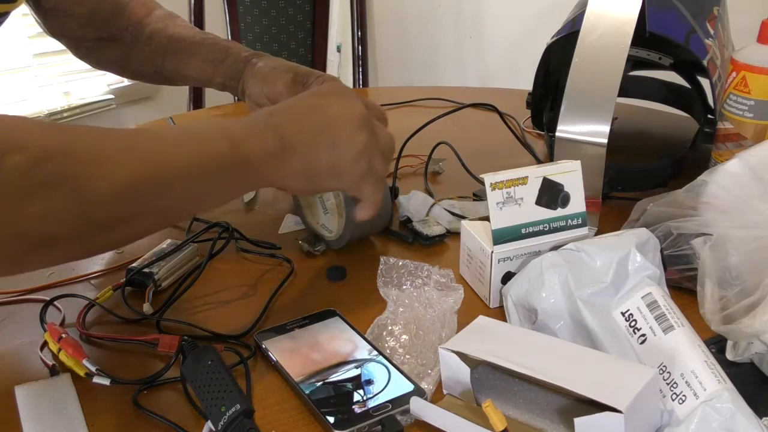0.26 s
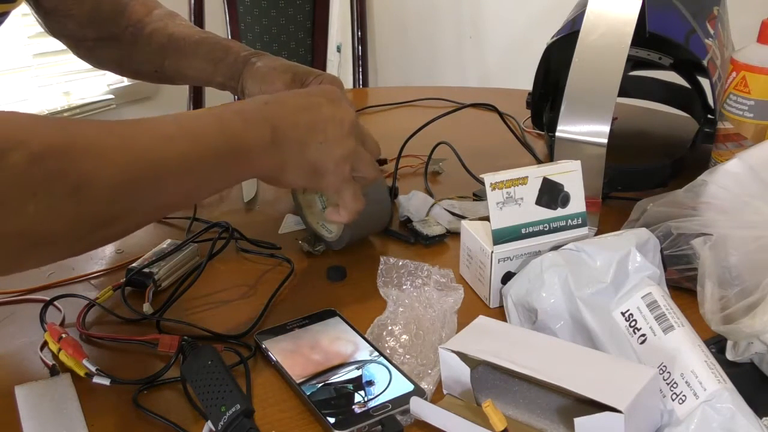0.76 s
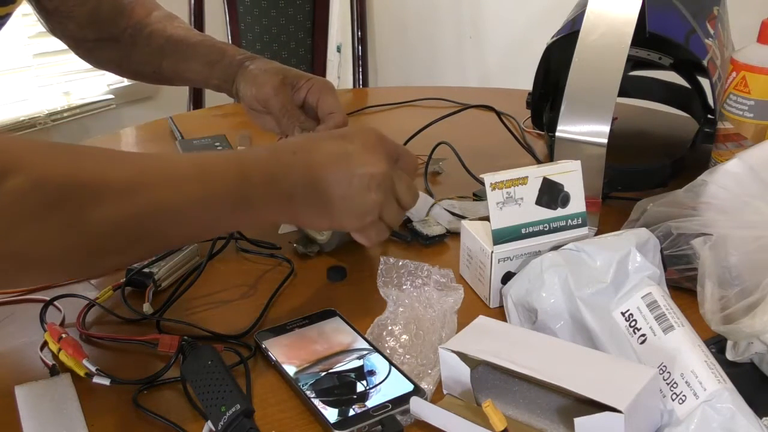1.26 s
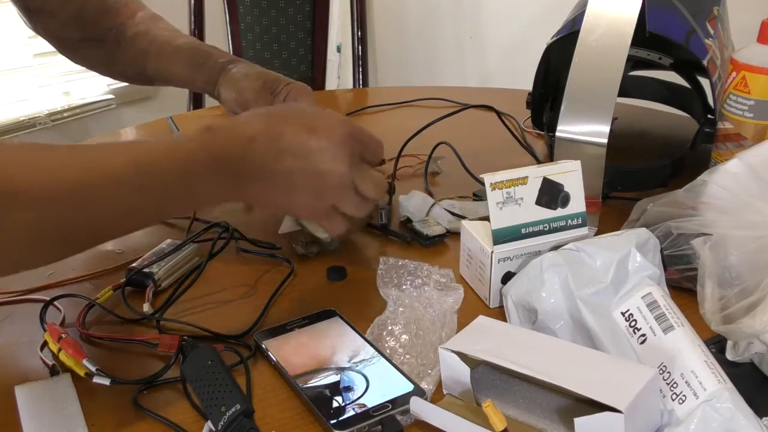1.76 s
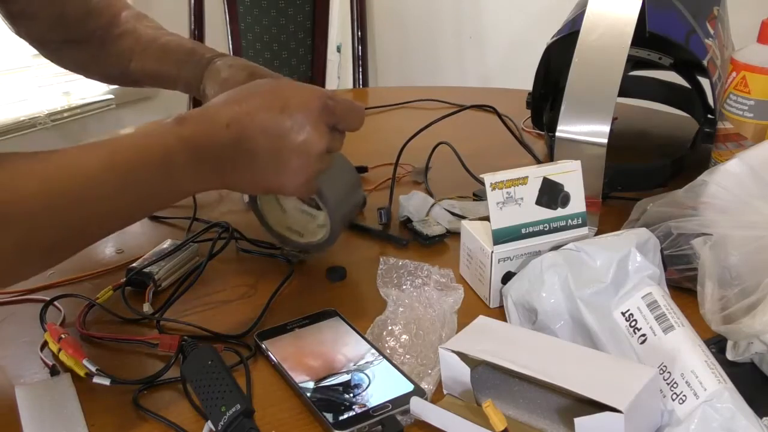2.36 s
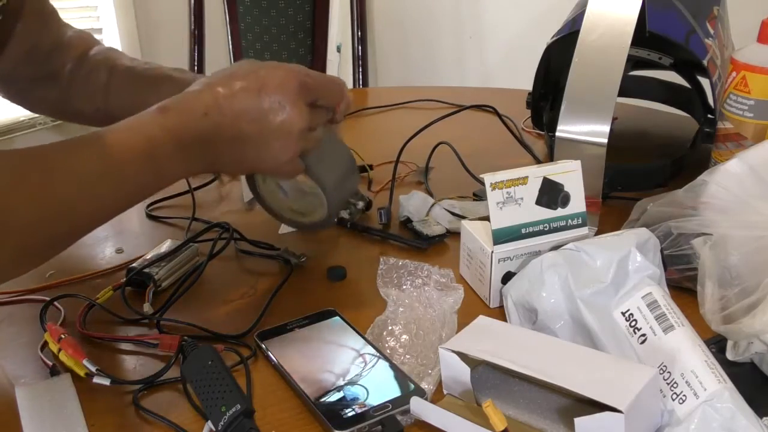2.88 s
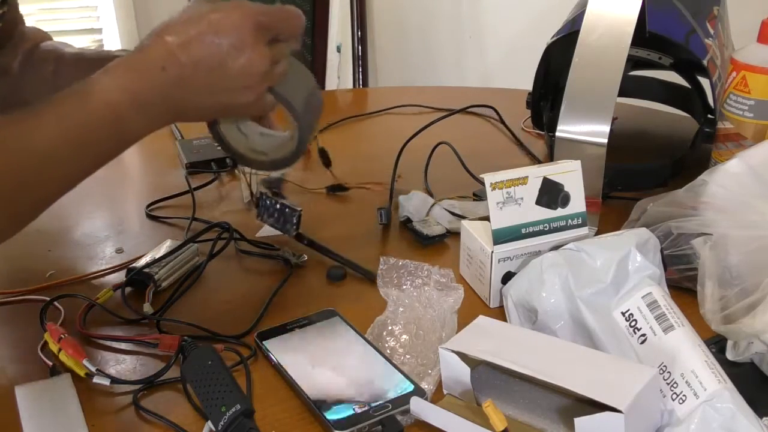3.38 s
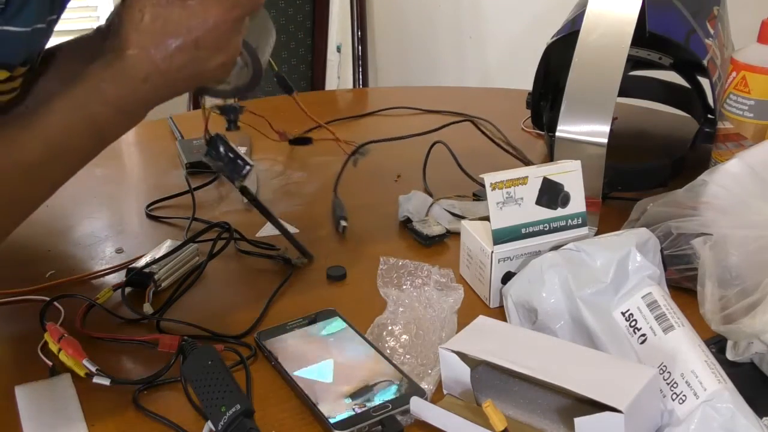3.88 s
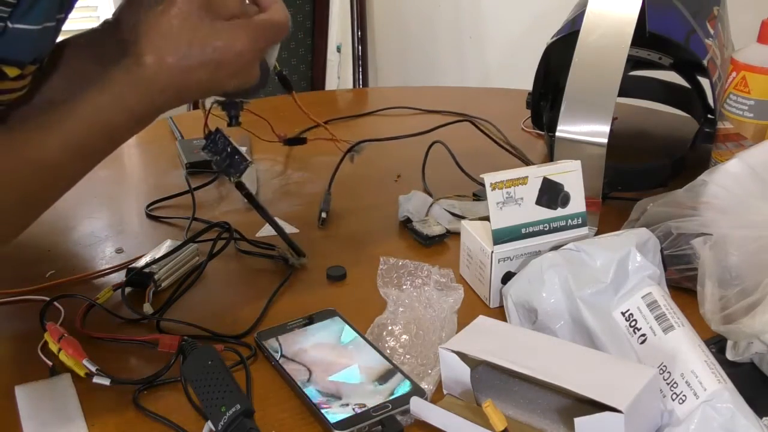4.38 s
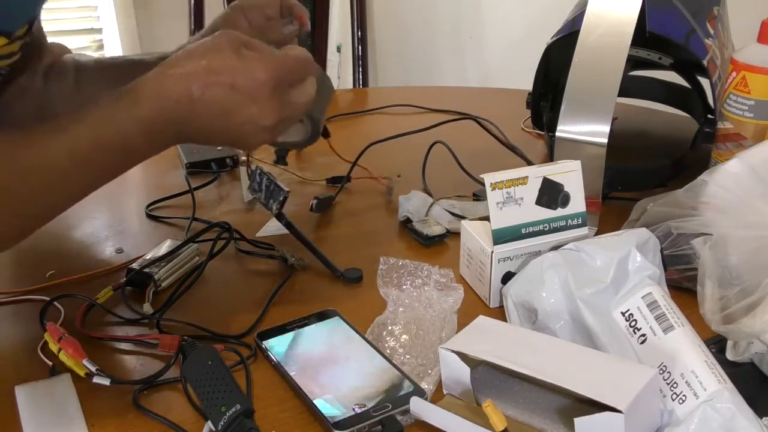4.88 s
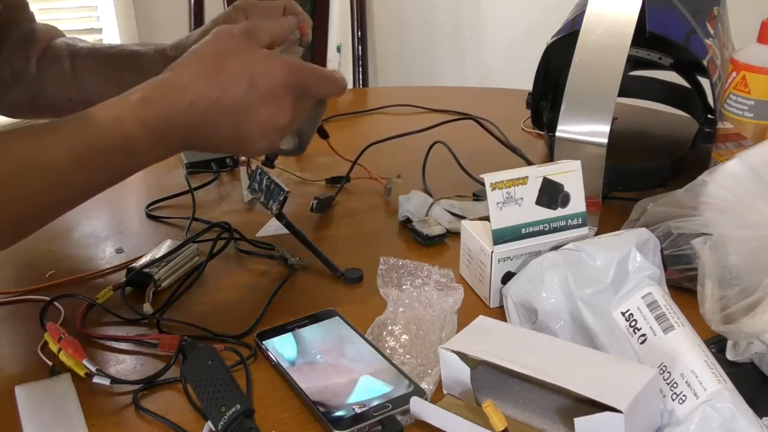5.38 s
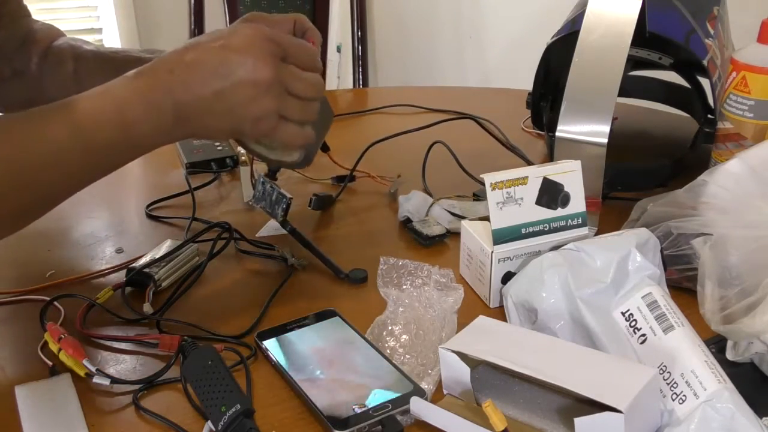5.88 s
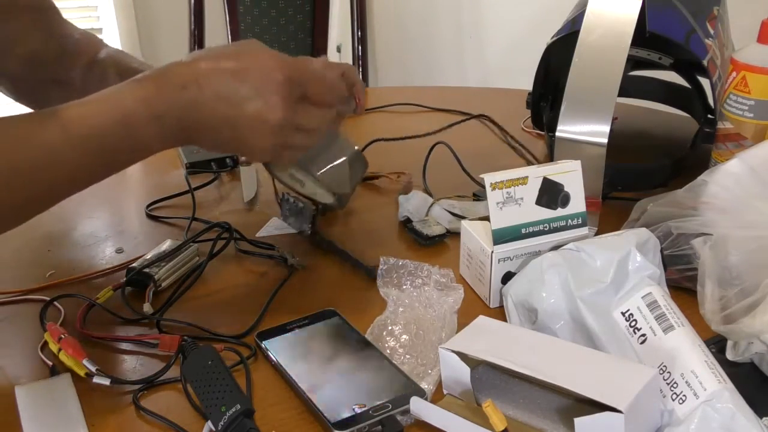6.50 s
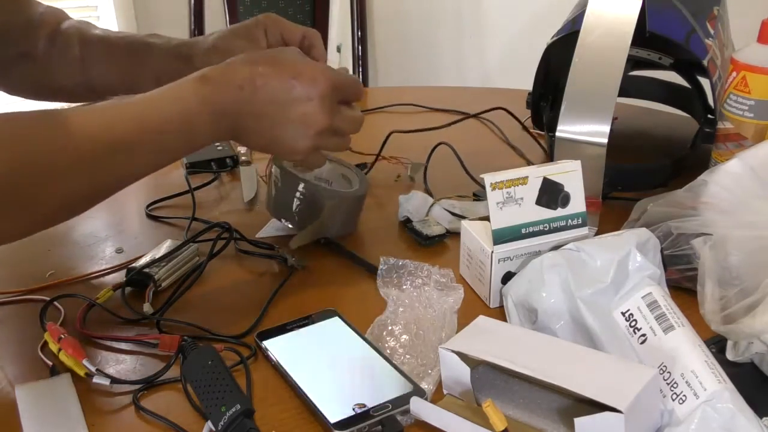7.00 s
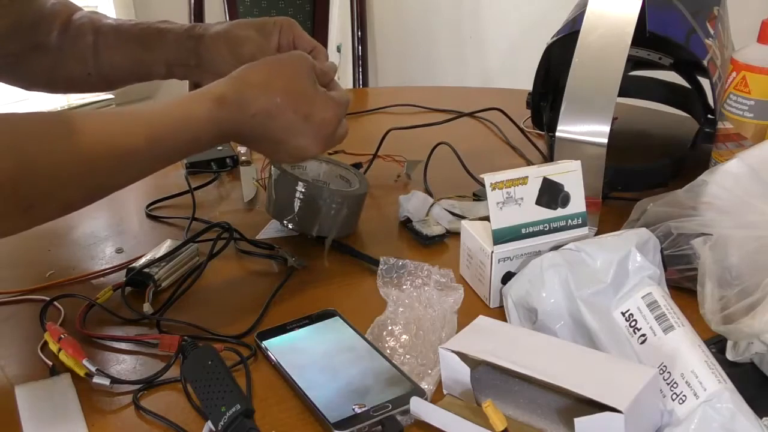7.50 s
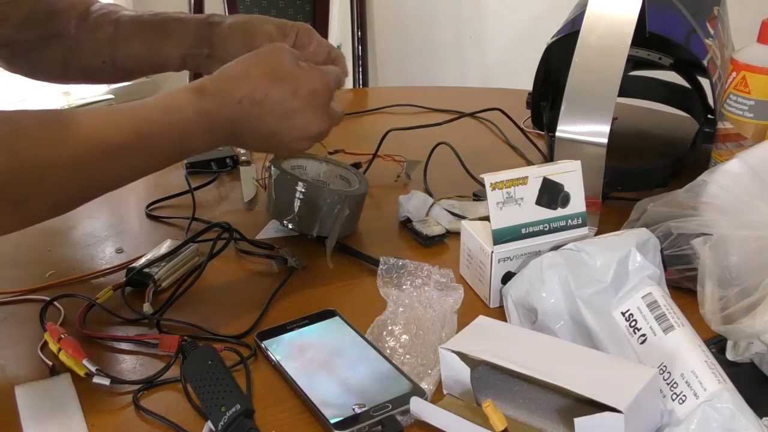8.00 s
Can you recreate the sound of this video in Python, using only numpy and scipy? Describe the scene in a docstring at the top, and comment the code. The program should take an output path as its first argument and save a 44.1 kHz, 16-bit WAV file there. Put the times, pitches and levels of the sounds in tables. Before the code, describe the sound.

In a hard, small-sounding room with a soft low hum and slight hiss, hands handle a roll of duct tape close to the microphone. The first 1.4 seconds are quiet, with only faint ticks and sticky crackle. Around 1.55 to 1.98, very loud bright snaps come in two bursts, near 1.68 and 1.91, each with a rasping rip fading over under 0.2 seconds. Smaller snaps and crackle follow; hard clacks and woody thumps land around 2.58, 3.3 and 3.6. A faint airy swish passes near 3, and soft rubbing squeaks near 3.5 and 3.8. Light clicks lead to a sharp snap at 4.88, then a strong snap and booming knock at 5.56. After a quieter gap, crisp ticks and short rips appear from 6.36 to 6.7. Knocks cluster from 6.95 to 7.4, strongest near 7.25, then handling thins out, with a small snap at 8.2.

```python
"""Bright snaps and short rips burst out as hands work a roll of duct tape over a cluttered wooden table.
Snaps are short noise bursts, rips and soft rustles are crowded clicks,
and faint breathy swishes and a soft rubbing squeak are clicks through a narrow resonance.
Knocks and scuffs ring the hard roll and small parts, and the booming table top, as sets of fading tones.
A hard room adds a few early bounces and a noisy, fading tail; a quiet hum lies beneath."""
import sys
import numpy as np
from scipy import signal
from scipy.fft import rfft, irfft
from scipy.io import wavfile

SR = 44100
rng = np.random.default_rng(int(sys.argv[2]) if len(sys.argv) > 2 else 0)


def wrap_up_sound(samples):
    """Save the sound to the file named by the first command line argument, as 16-bit audio."""
    columns = np.atleast_2d(samples).T
    # keep every value between -1 and 1, then stretch to whole-number steps
    tamed = np.clip(columns, -1, 1)
    steps = np.round(tamed * 32767).astype(np.int16)
    wavfile.write(sys.argv[1], SR, steps)


def boost_factor(decibels):
    """Convert a level in decibels to a linear amplitude factor."""
    exponent = np.asarray(decibels, float) / 20
    return 10 ** exponent


N = 363825  # samples, 8.25 seconds

# Glue letting go in clear snaps.
# Each row: start in seconds, peak in dB before panning, treble against body in dB before bright colouring.
GLUE_SNAPS = [(0.2618, -35, 4), (0.5775, -26, -6), (0.9992, -37.5, 3), (1.4, -22.5, 0), (1.556, -12.5, -4),
              (1.5656, -12.5, 29), (1.6795, -1.5, 1), (1.6861, -4, 22), (1.6969, -63, 22),
              (1.7419, -12, 19), (1.9121, -3, 25), (1.917, -4.5, 7), (1.9435, -6, 0), (1.9529, -23, -44),
              (1.9768, -14, 11), (2.1947, -29, 16), (2.2016, -26, -1), (2.2629, -22, -1.5),
              (2.2798, -26.5, -4), (2.2998, -29.5, 3), (2.3695, -27, -4), (2.4565, -31.5, -4.5),
              (2.5886, -21, -11), (2.6873, -33, -9), (3.5176, -34, -12), (3.731, -35.5, -14),
              (3.8565, -27.5, 14), (3.995, -31.5, 7), (4.2085, -19.5, -9), (4.2342, -19, -6),
              (4.4486, -30, -10), (4.4982, -30.5, -2), (4.588, -28.5, -5.5), (4.616, -23.5, 0.5),
              (4.653, -24, -2.5), (4.7294, -17, -1), (4.7634, -26, -6), (4.8446, -24.5, -6),
              (4.865, -12, 8), (4.8775, -4, 1), (5.021, -38, 2), (5.0427, -19, 5), (5.0853, -28, 2),
              (5.1464, -26, -37), (5.1822, -22.5, 5), (5.2565, -25, -13), (5.299, -26, 15),
              (5.339, -27, 13), (5.3565, -33, 8), (5.3691, -18.5, 20), (5.5583, -5, -1),
              (5.7041, -15.5, 2.5), (5.987, -38.5, 0), (6.2258, -32.5, 2), (6.3121, -27, 2),
              (6.3578, -13.5, 12), (6.3758, -11.5, 16), (6.406, -16, -6), (6.557, -28.5, -6),
              (6.5775, -15.5, -43), (6.6904, -12.5, 19), (6.8039, -33, 7), (6.855, -31, -1),
              (6.8727, -27.5, -16), (7.0163, -16, 1.5), (7.2497, -24, -33), (7.2804, -19.5, -2),
              (7.288, -15.5, -8), (7.3863, -32.5, -10), (8.2038, -23, 2)]
# Roll and parts striking the table. Each row: start in seconds, clack drive in dB,
# clack brightness in dB per octave, table boom drive in dB, boom brightness in dB per octave.
TABLE_KNOCKS = [(0.5749, -53.5, 2, -51.5, -10), (0.7682, -59, -12.5, -60, 13), (0.8184, -58, -1, -44.5, -8),
                (1.2628, -55.5, -9, -58, 13), (1.3283, -52, 0, -67, -3), (1.3983, -63, 20, -49, 0),
                (1.467, -53.5, -5, -50.5, -13), (1.5549, -45.5, 27, -49, -10), (1.681, -26, -1.5, -46, -9),
                (1.9162, -44.5, -15, -40.5, 2), (1.9458, -25.5, 18, -44, 2), (1.9724, -37, 16, -49, 7),
                (2.194, -43.5, 16, -42, -3), (2.3163, -42.5, 3, -35.5, 1), (2.3767, -42, -4.5, -42, 2),
                (2.5563, -49.5, 16, -42, -6), (2.5748, -33.5, -4.5, -32, 3), (2.5854, -22.5, 6.5, -27, -5),
                (2.7583, -29.5, -4, -33, 14), (2.8217, -32.5, 3.5, -42, 0), (3.0604, -65, 7, -43, -1.5),
                (3.134, -50, 11, -43, -7), (3.3003, -33.5, -5, -32.5, 2), (3.4667, -40, -9, -39.5, 6),
                (3.526, -37.5, 1, -44, 14), (3.576, -56.5, -19, -37.5, 6), (3.606, -21.5, 6, -34, 12),
                (3.6167, -31, 0, -42, 4), (3.7094, -48.5, 25.5, -39.5, -3), (3.7345, -29, 5.5, -51, 11),
                (4.2094, -32, 6.5, -41, 6.5), (4.255, -39.5, 6, -65, 9), (4.4905, -47, -5, -43.5, 6.5),
                (4.5524, -45, -9, -52.5, 10), (4.8579, -31, -5.5, -68, 9), (4.8677, -35.5, 11, -47, 18),
                (5.2389, -28.5, 13, -52, -4), (5.364, -39.5, 6.5, -60, 18), (5.5582, -19, 7, -13.5, 1.5),
                (6.1418, -46, 17.5, -52, -8), (6.235, -48, 17.5, -50, -14), (6.359, -42.5, 20, -63.5, 23),
                (6.5714, -36, 13.5, -47.5, 18), (6.871, -47, 20, -47.5, -3), (6.9452, -41, -4, -45, 7),
                (6.965, -26, -8, -26.5, 2.5), (7.0501, -34, -1, -35, 10), (7.0874, -25, -0.5, -36.5, 1),
                (7.0954, -35, -0.5, -40.5, 16), (7.1675, -43, 8, -38, -7), (7.2465, -16.5, 2, -24, 14),
                (7.2854, -16, 15.5, -19.5, -1), (7.3483, -70, -4, -25.5, -6),
                (7.3854, -36.5, -10.5, -26.5, -0.5), (7.4905, -39.5, -3.5, -45, 11),
                (7.6273, -49, -10.5, -48.5, 9.5), (8.2005, -49.5, 0, -62.5, -6)]
# Tape rips and soft rustles. Each row: start in seconds, length in milliseconds, first level in dB,
# last level in dB, treble in dB.
RIPS_AND_RUSTLES = [(1.679, 158, -21.5, -40.5, 1), (1.911, 178, -24, -44, -1), (2.262, 35, -43, -27, 0),
                    (2.571, 15.5, -35, -26, -1.5), (2.757, 21, -58, -60, -1), (2.969, 31, -51, -55, -5),
                    (3.128, 36, -43, -56, 0), (3.707, 50, -59, -46, -5), (4.03, 44, -39.5, -46.5, -0.5),
                    (4.395, 33, -51.5, -53, 1), (4.866, 13, -30.5, -32.5, -1),
                    (6.689, 10, -30.5, -40, -2.5), (6.794, 28, -42, -46, -2.5), (4.209, 110, -51, -52, -1),
                    (4.847, 35, -31, -34, -1), (5.363, 48, -34, -45, -0.5), (5.561, 14.3, -28, -33, 1),
                    (6.358, 17, -18.5, -32, -2), (6.571, 74, -29, -46, -46), (6.844, 77, -38.5, -57, 1.5),
                    (7.278, 9.5, -39, -26, -17.5), (7.3, 134, -67, -42, -5)]
# Steady handling, before its uneven drift. Each row: time in seconds, drag on the table in dB,
# scuffing of the roll in dB, scuffing brightness in dB per octave, glue crackle in dB.
HANDLING_LEVELS = [(0.0, -102, -93.5, 3, -72.5), (1.1, -115, -100, 2, -80), (1.6, -86.5, -85, -1, -98),
                   (1.76, -105, -69.5, -4, -72), (1.89, -103, -100, 0, -77), (2.04, -86, -65.5, 17, -52),
                   (2.23, -99, -79, -1, -69), (2.5, -82, -83, 5, -61.5), (2.73, -78, -70, 0.5, -58.5),
                   (2.9, -92, -79.5, 5, -60.5), (3.1, -86.5, -76.5, -3, -62), (3.4, -90, -73, 1, -69),
                   (3.55, -76, -66, 5, -57), (3.8, -100, -76.5, 9, -67), (3.95, -97.5, -79, 6, -53),
                   (4.15, -89, -76, 5, -55.5), (4.41, -82.5, -71.5, -0.5, -62.5),
                   (4.66, -115, -77, 6.5, -64.5), (5.3, -100, -83.5, 8.5, -48), (5.6, -110, -88, -4, -89),
                   (6.05, -91.5, -78, 3.5, -64), (6.27, -85, -80, 9, -49.5), (6.5, -110, -92, -4.5, -53.5),
                   (7.0, -103, -67.5, 8, -49), (7.35, -94, -62, 5, -57), (7.5, -90, -67.5, 5, -68),
                   (7.79, -108, -105, 8, -78), (8.25, -105, -100, 2.5, -74.5)]
# Tones of the table top. Each row: pitch in Hz, level in dB, time to fade by 60 dB in seconds.
TABLE_MODES = [(71, -27, 0.15), (134.6, -14, 0.34), (210, -3, 0.083), (245, -11.5, 0.34),
               (292.4, -1.5, 0.093), (332, -3, 0.14), (383.7, -3, 0.091), (435.2, -4, 0.1),
               (501.5, -4.5, 0.067)]
# Tones of the cardboard core and hard small parts.
# Each row: pitch in Hz, level in dB, time to fade by 60 dB in seconds.
ROLL_MODES = [(576, -5, 0.0061), (1084, 1.5, 0.012), (1253, -2.5, 0.028), (1388, 2, 0.0095),
              (1607, 0.5, 0.012), (1842, 4, 0.0088), (2000, 3, 0.009), (2300, 0, 0.0081), (2880, 2, 0.0033),
              (3580, -5, 0.0016), (4040, -4.5, 0.0018)]
# Bright colouring of snaps and crackle: a few broad lifted bands, strongest near 9 kHz.
# Each row: centre in Hz, width in Hz, lift in dB.
BRIGHT_BANDS = [(3050, 6300, 9), (6240, 710, 4.5), (8860, 3900, 16.5)]
# How long the walls ring. Each row: pitch in Hz, time to fade by 60 dB in seconds.
WALL_FADE = [(100, 0.93), (260, 0.41), (700, 0.48), (1840, 0.47), (4850, 0.39), (12800, 0.27)]
# How strongly the walls ring. Each row: pitch in Hz, level in dB against the direct energy.
WALL_STRENGTH = [(100, 0), (300, 9.5), (1000, 3.5), (3000, -2.5), (8000, 2.5), (15000, -8)]
# How alike the walls sound left and right. Each row: pitch in Hz, likeness from 0 to 1.
WALL_ALIKE = [(100, 0.99), (400, 0.96), (1500, 0.51), (5000, 0.64), (15000, .05)]
# First bounces. Each row: left delay in milliseconds, right delay in milliseconds, level in dB.
FIRST_ECHOES = [(3.2, 9.9, -11), (8.5, 7.4, -3.5), (16.5, 16, -17)]
# Shape of the room hum. Each row: pitch in Hz, relative level in dB per Hz.
HUM_SHAPE = [(12, -59), (20, -10), (103, -5), (136, -4.5), (166, -4.5), (283, -9), (317, -19), (375, -12),
             (623, -27.5), (1220, -15.5), (2770, -23.5), (4350, -31), (5150, -38), (15000, -26),
             (16800, -64.5)]
# How alike the hum sounds left and right. Each row: pitch in Hz, likeness from 0 to 1.
HUM_ALIKE = [(30, 0.83), (130, 0.27), (640, 0.57), (1400, 0.21), (5000, 0.25), (15000, .05)]
# Faint breathy swishes and a soft rubbing squeak.
# Each row: start in seconds, length in seconds, level in dB at full swell, centre in Hz,
# width in Hz of each of two passes.
SWISHES_AND_SQUEAK = [(2.86, 0.45, -64, 12500, 1780), (3.427, 0.042, -63.5, 9800, 2000),
                      (3.454, 0.12, -57, 2620, 400), (3.753, 0.27, -57, 2550, 350),
                      (5.922, 0.41, -63, 1110, 249)]

SMALL_SNAPS_PER_S, SMALL_SNAP_DB, SMALL_SPREAD_DB = 12, 11, 5  # rate, peak over the crackle, spread either way
SNAP_PAN_DB, SNAP_PAN_SPREAD_DB = -1.0, 3.5  # left minus right, and its random spread
PATCHY_DB, DRIFT_HZ = 5.5, 4  # scuffing and crackle swell and fade unevenly: spread and speed
CRACKLE_TREBLE_DB = -1  # crackle's upper band, between rips and rustles
CONTACT_RISE_MS = 0.99  # a blow takes a moment to build
DRAG_TILT_DB = 3.5  # per octave
HUM_DB = -59.5
LEFT_LAG_MS = 0.016


def in_time(rows):
    """Reads the columns of a table at every sample, sliding between its rows."""
    s, *columns = np.transpose(rows)
    return [np.interp(np.arange(N) / SR, s, column) for column in columns]


def at_hz(points, hz):
    """Reads a curve on a log-frequency axis, because equal pitch steps are equal ratios."""
    table_hz, values = np.array(points).T
    return np.interp(np.log(hz), np.log(table_hz), values)


def rms_one(x):
    """Scales a sound to an rms (average strength) of 1."""
    return x / np.sqrt(np.mean(x ** 2) + 1e-20)


def cut(x, hz, kind, order=2):
    """Butterworth filter: removes part of the pitch range smoothly."""
    return signal.sosfilt(signal.butter(order, hz, kind, fs=SR, output="sos"), x)


def resonate(x, hz, width_hz):
    """A resonance passes its own pitch at gain 1 and less of what lies around it."""
    r = np.exp(-np.pi * width_hz / SR)
    forward = [(1 - r * r) / 2, 0, (r * r - 1) / 2]
    feedback = [1, -2 * r * np.cos(2 * np.pi * hz / SR), r * r]
    return signal.lfilter(forward, feedback, x)


def ring(clicks, hz, t60):
    """A unit click sets a fading sine of height 1 ringing."""
    r, w = boost_factor(-60 / (t60 * SR)), 2 * np.pi * hz / SR
    return signal.lfilter([0, np.sin(w)], [1, -2 * r * np.cos(w), r * r], clicks + 1e-18)


def grains(per_s, spread_db):
    """Random clicks of uneven size, like tiny separate slips; rms 1."""
    sizes = boost_factor(spread_db * np.minimum(rng.exponential(1, N), 5)) * rng.choice([-1, 1], N)
    return rms_one(sizes * (rng.random(N) < per_s / SR))


def bursts(times, length_ms):
    """One break per event: noisy micro-slips die away, fairly even in spectrum; energy 1."""
    dying = np.exp(-np.arange(1024) * 1000 / SR / length_ms)
    spectrum = rfft(rng.standard_normal((len(times), 1024)) * dying, axis=1)
    evened = irfft(spectrum / np.abs(spectrum) ** .7, axis=1)
    rows = evened * dying ** .3
    return rows / np.sqrt(np.sum(rows ** 2, axis=1, keepdims=True))


def add(track, times, rows):
    """Lays short sounds into a track at their times, so overlaps sum."""
    for s, row in zip(times, rows):
        i = round(s * SR)
        track[..., i:i + row.shape[-1]] += row[..., :N - i]


def drift(speed_hz):
    """Slow random wandering with a spread of 1: noise smoothed by two equal low-pass steps."""
    r = np.exp(-2 * np.pi * speed_hz / SR)
    wandering = signal.lfilter([1], [1, -2 * r, r * r], rng.standard_normal(N + SR))
    return rms_one(wandering[SR:])  # skip one second of settling


def stereo_bands(likeness, size, count):
    """Stereo noise in count bands per octave, as (centre Hz, width Hz, noise); neighbours are unrelated."""
    white = rng.standard_normal((2, 2, size))
    edges = 20 * 2 ** np.arange(0, 10.01, 1 / count)
    for k, (low, high) in enumerate(zip(edges, edges[1:])):
        mid, side = cut(white[k % 2], [low, high], "band")
        hz = np.sqrt(low * high)
        alike = np.clip(at_hz(likeness, hz), 0, 1)
        noise = np.sqrt(1 + alike) * mid + np.sqrt(1 - alike) * side * [[1], [-1]]
        yield hz, high - low, noise


def bright_colour(x):
    """Bright colouring of snaps and crackle: resonances added to the sound lift a few broad bands."""
    return x + sum((boost_factor(db) - 1) * resonate(x, hz, width_hz) for hz, width_hz, db in BRIGHT_BANDS)


def snaps(crackle_db):
    """Each snap is a patch of glue breaking; small ones come by chance and follow the crackle."""
    chance = rng.random((round(SMALL_SNAPS_PER_S * N / SR), 3))
    small_s = chance[:, 0] * (N - 1) / SR
    small_db = crackle_db[(small_s * SR).astype(int)] + SMALL_SNAP_DB
    small_db = small_db + SMALL_SPREAD_DB * (2 * chance[:, 1] - 1)
    small_treble_db = 16 * (chance[:, 2] - .5)
    small = np.transpose([small_s, small_db, small_treble_db])
    s, peak_db, treble_db = np.vstack([GLUE_SNAPS, small]).T
    pan_db = SNAP_PAN_DB + SNAP_PAN_SPREAD_DB * rng.standard_normal(len(s))

    slips = bursts(s, length_ms=1.0)
    body = cut(cut(slips, 2340, "high", order=3), 6200, "low")
    top = cut(slips, 5920, "high")
    # turn down the weaker of the two
    body = body * boost_factor(-np.maximum(treble_db, 0))[:, None]
    top = top * boost_factor(np.minimum(treble_db, 0))[:, None]
    rows = bright_colour(body + top)
    rows = rows * (boost_factor(peak_db) / np.abs(rows).max(axis=1))[:, None]
    left_right = boost_factor(np.outer(pan_db, [.5, -.5]))
    out = np.zeros((2, N))
    add(out, s, rows[:, None] * left_right[..., None])
    return out


def crackle(crackle_db):
    """Fingers on sticky tape make dense tiny releases; rips and soft rustles raise the same clicks."""
    level, treble = boost_factor(crackle_db), np.full(N, boost_factor(CRACKLE_TREBLE_DB))
    t = np.arange(N) / SR
    for s, length_ms, first_db, last_db, treble_db in RIPS_AND_RUSTLES:
        inside = (t >= s) & (t < s + length_ms / 1000)
        along = (t[inside] - s) * 1000 / length_ms
        level[inside] += boost_factor(first_db + (last_db - first_db) * along)
        treble[inside] = boost_factor(treble_db)
    releases = rms_one(bright_colour(cut(grains(1800, spread_db=3.0), 1700, "high")))
    return level * (cut(releases, 7160, "low") + treble * cut(releases, 9330, "high"))


def swishes_and_squeak():
    """Random clicks pass twice through one resonance, swelling and fading each time."""
    out, clicks = np.zeros(N), grains(3000, spread_db=4.0)
    for s, length_s, db, hz, width_hz in SWISHES_AND_SQUEAK:
        along = np.clip((np.arange(N) / SR - s) / length_s, 0, 1)
        swell = np.sqrt(np.sin(np.pi * along) + 1e-12)
        narrow = resonate(resonate(clicks, hz, width_hz), hz, width_hz)
        out += boost_factor(db) * swell * rms_one(narrow)
    return out


def struck(modes, times, level_db, tilt_db, contact, rubbing, rubbing_tilt_db):
    """Every blow drives each tone with its own strength; rubbing keeps the tones going between blows."""
    out, chance = np.zeros(N), rng.standard_normal((len(times), len(modes)))
    side = rng.choice([-1, 1], (len(times), len(modes)))  # each tone's first swing goes up or down at random
    octaves = np.log2(np.array(modes)[:, 0])
    for k, (hz, mode_db, t60) in enumerate(modes):
        above = octaves[k] - np.mean(octaves)  # octaves above the middle tone
        blow = side[:, k] * boost_factor(level_db + tilt_db * above + 2.0 * chance[:, k])
        drive = rubbing * boost_factor(rubbing_tilt_db * above)
        add(drive, times, contact * blow[:, None])
        out += (-1) ** k * boost_factor(mode_db) * ring(drive, hz, t60)
    return out


def table_and_roll(drag_db, scuff_db, scuff_tilt_db):
    """Knocks and rubbing ring the roll (clack) and the table top (boom)."""
    s, clack_db, clack_tilt_db, boom_db, boom_tilt_db = np.transpose(TABLE_KNOCKS)
    rise = 1 - np.exp(-np.arange(1024) * 1000 / SR / CONTACT_RISE_MS)
    spectrum = rfft(bursts(s, length_ms=3.26) * rise, axis=1)
    contact = irfft(spectrum / np.abs(spectrum), axis=1)  # a hard contact feeds every pitch alike
    push = signal.windows.hann(110)[None] / 55  # a blunt shove reaches the low tones
    scuffing = boost_factor(scuff_db) * grains(1200, spread_db=5.0)
    dragging = boost_factor(drag_db) * grains(150, spread_db=0.0)
    roll = struck(ROLL_MODES, s, clack_db, clack_tilt_db, contact, scuffing, scuff_tilt_db)
    table = struck(TABLE_MODES, s, boom_db, boom_tilt_db, push, dragging, DRAG_TILT_DB)
    return cut(roll, 550, "high"), cut(table, 78, "high")


def room(x):
    """Walls send back a few first bounces, then diffuse noise that dies band by band."""
    size = 3 * SR // 4
    t = np.arange(size) / SR
    response = np.zeros((2, size))
    for hz, width_hz, noise in stereo_bands(WALL_ALIKE, size, count=6):
        tail = noise * boost_factor(-60 * t / at_hz(WALL_FADE, hz)) * (1 - np.exp(-t / 0.00043))
        share = 2 * width_hz / SR  # energy of a unit click inside this band
        to_share = np.sqrt(share / np.sum(tail ** 2, axis=1, keepdims=True))
        response += boost_factor(at_hz(WALL_STRENGTH, hz)) * tail * to_share
    # cluttered surfaces blur and dull each bounce
    smear = cut(bursts(FIRST_ECHOES, length_ms=0.48), 13000, "low", order=1)
    for (left_ms, right_ms, db), bounce in zip(FIRST_ECHOES, smear):
        add(response[0], [left_ms / 1000], [boost_factor(db) * bounce])
        add(response[1], [right_ms / 1000], [boost_factor(db) * bounce])
    return signal.fftconvolve(x.mean(axis=0)[None], response, axes=1)[:, :N]


def hum():
    """Quiet air and appliance noise of the room with microphone hiss, as steady shaped noise."""
    bands = stereo_bands(HUM_ALIKE, N, count=2)
    return boost_factor(HUM_DB) * rms_one(sum(boost_factor(at_hz(HUM_SHAPE, hz)) * noise for hz, _, noise in bands))


def scene():
    """Hands a little nearer the right microphone; the table-top bounce weakens a band near 750 Hz."""
    drag_db, scuff_db, scuff_tilt_db, crackle_db = in_time(HANDLING_LEVELS)
    scuff_db = scuff_db + PATCHY_DB * drift(DRIFT_HZ)
    crackle_db = crackle_db + PATCHY_DB * drift(DRIFT_HZ)
    roll, table = table_and_roll(drag_db, scuff_db, scuff_tilt_db)
    near = snaps(crackle_db) + roll + crackle(crackle_db) + swishes_and_squeak()
    heard = near + table + room(near + boost_factor(-9.0) * table)
    heard = heard - 0.15 * resonate(heard, 747, 720) + hum()
    # sound reaches the left side slightly later
    lag = np.exp(-2j * np.pi * np.fft.rfftfreq(N, 1 / SR) * LEFT_LAG_MS / 1000)
    return np.stack([irfft(rfft(heard[0]) * lag, N), heard[1]])


def top_cut(x):
    """Nothing passes above the cut-off."""
    return signal.sosfilt(signal.butter(12, 16980, fs=SR, output="sos"), x)


def record(dry):
    """The input stage rounds the highest peaks, and the top is cut steeply near 16 kHz."""
    rounded = .8 * np.tanh(dry / .8)
    steep = signal.cheby2(10, 30, 16300, fs=SR, output="sos")
    mix = signal.sosfilt(steep, rounded)
    return top_cut(mix)


dry = scene()
out = record(dry)
wrap_up_sound(out)
```